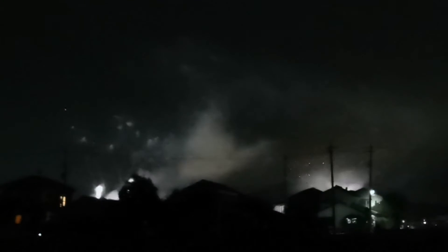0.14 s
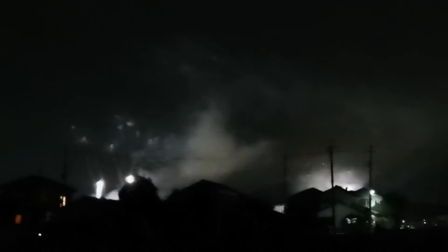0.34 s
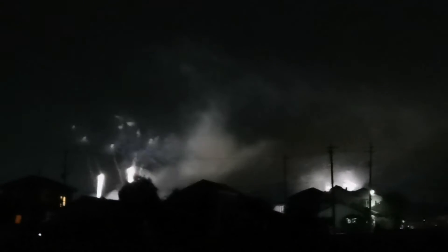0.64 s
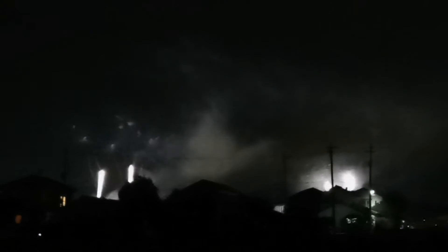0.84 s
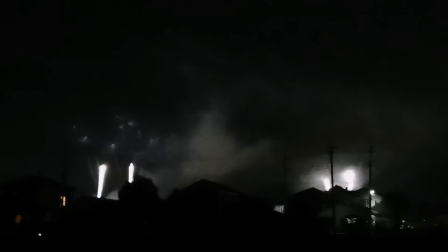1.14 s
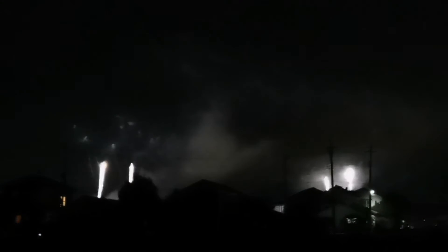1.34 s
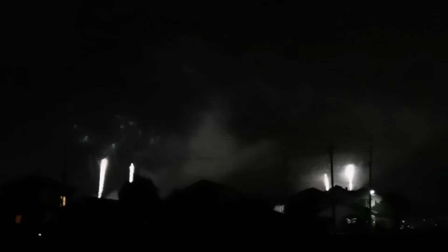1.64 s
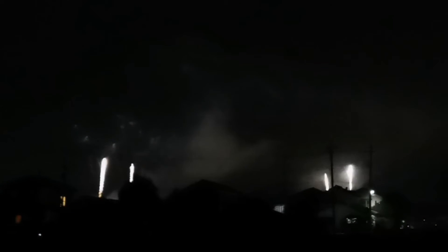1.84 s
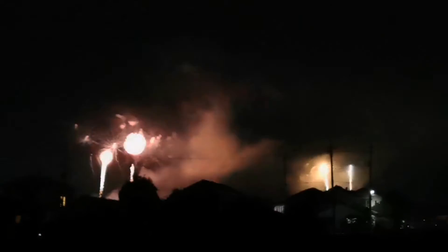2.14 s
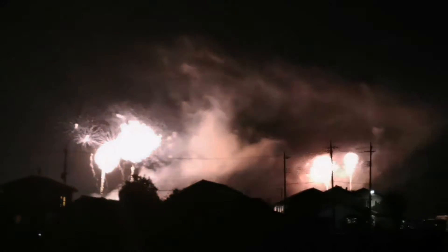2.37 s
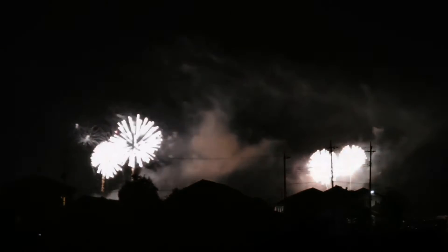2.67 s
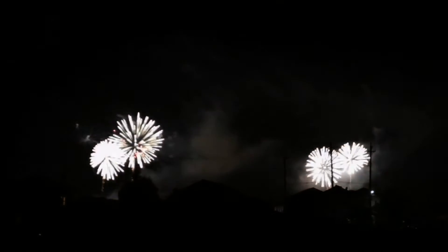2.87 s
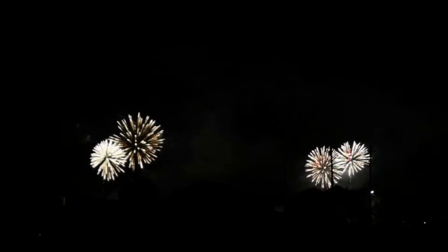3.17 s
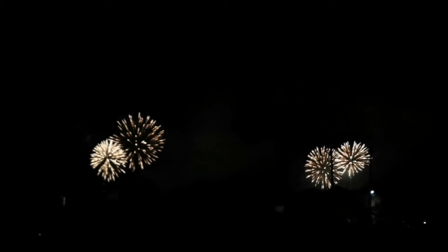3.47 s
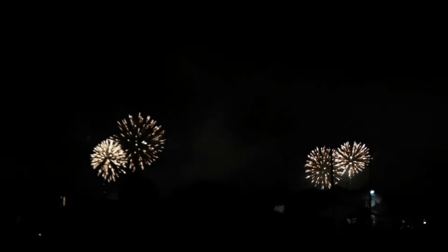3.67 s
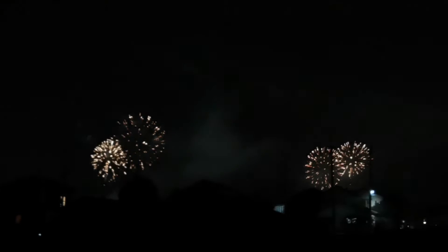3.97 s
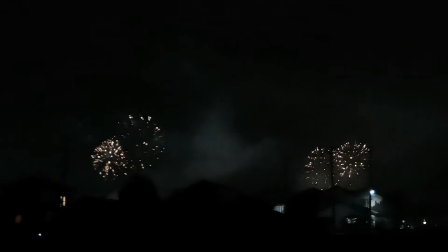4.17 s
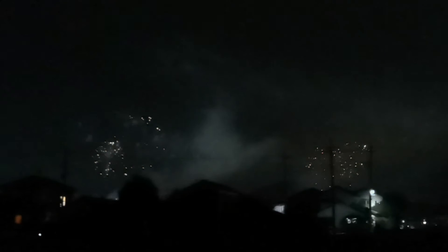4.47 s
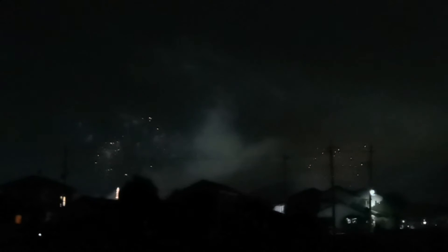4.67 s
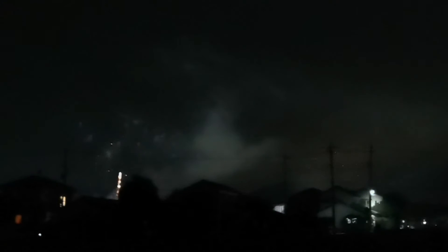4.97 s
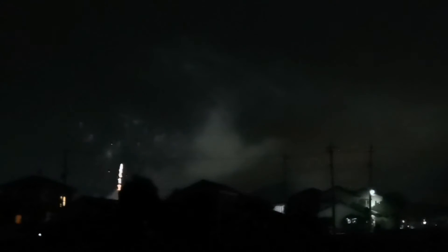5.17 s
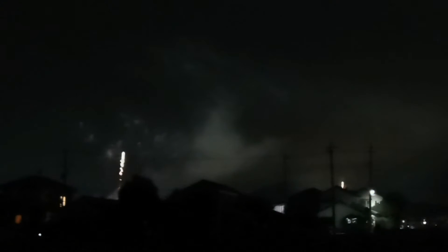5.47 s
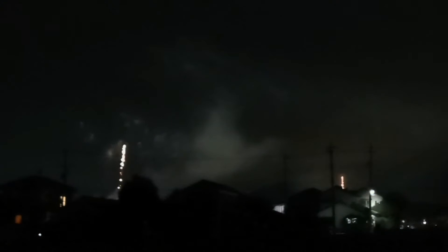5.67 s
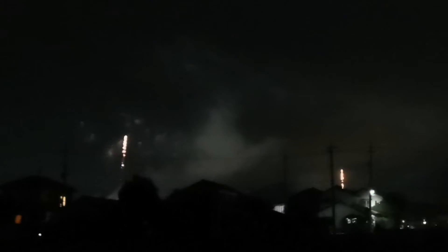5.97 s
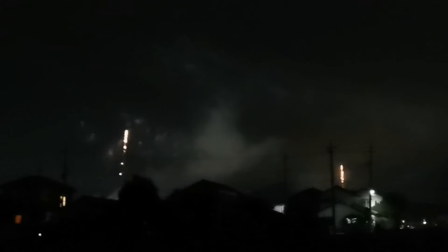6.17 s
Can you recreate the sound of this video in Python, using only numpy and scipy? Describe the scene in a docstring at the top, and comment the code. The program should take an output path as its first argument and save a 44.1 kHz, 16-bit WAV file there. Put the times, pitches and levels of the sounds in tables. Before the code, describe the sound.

Night fireworks about a kilometre off, heard in stereo from among low houses, lasting some six and a half seconds. At 0.1 s a bang cracks, followed at 0.19 s by two practically fused, stronger ones; their short frayed cracks spill into a deep boom and bright, lumpy crackle, with a hillside return about 0.3 s later. Dull far thuds follow at 0.3 to 0.5 s. Softer bangs come at 1.46, 1.58 and 1.81 s, while a brief gritty scuff and several dry clicks, mostly left, sound right at the microphone between 1.5 and 1.7 s. From 2 to 5 s the echoes drain into low, restless rumble with faint muffled thuds. At 5.15 and 5.25 s the heaviest pair slams out, and its rolling boom and crackle decay until the end. Very faint steady hiss underlies everything.

```python
"""Fireworks a kilometre off, heard at night from among low houses.
Each blast is one pressure wave, doubled by nearby walls and scattered into a rolling echo by roofs and open land.
Underneath go far thuds, made as duller waves with a short echo cluster, and a rumble of coloured scattered echoes.
Right at the microphones, bursts of gritty noise make a few scuffs and clicks, over a faint steady hiss."""
import sys
import numpy as np
from scipy import signal
from scipy.fft import rfft, irfft, next_fast_len
from scipy.io import wavfile
from scipy.ndimage import uniform_filter1d, minimum_filter1d, map_coordinates

SR = 44100
rng = np.random.default_rng(int(sys.argv[2]) if len(sys.argv) > 2 else 0)


def digitize_waveform(pressure):
    """Quantize a signal to 16-bit integers and store it at the path in sys.argv[1].

    Rows of a 2-D input are taken as channels; values are limited to [-1, 1].
    """
    field = np.atleast_2d(pressure).T
    bounded = np.clip(field, -1, 1)
    quanta = np.round(bounded * 32767).astype(np.int16)
    wavfile.write(sys.argv[1], SR, quanta)


N = 278271

# Bursts and mortar shots. Each row: start in seconds, direct wave level in dB, push length in seconds,
# dulling corner in Hz, second path delay in seconds, then gains in dB relative to the direct wave:
# second path, frayed crack, roof echo, land boom, land crackle.
BLASTS = [(0.0889, -4.5, 0.0012, 2075, 0.0033, -3.5, 22.5, -15, -12.5, -11.5),
          (0.1852, -3, 0.00091, 893, 0.0029, -5, 24, -12.5, -15.5, -15.5),
          (0.1893, -3, 0.0013, 3090, .0022, -11, 24.5, -15.5, -21.5, -13),
          (1.4599, -7.5, 0.0014, 2180, 0.0014, -5, 23, -17.5, -29, -17),
          (1.5807, -10.5, 0.0023, 634, 0.0064, -11, 26, -16, -19, -30.5),
          (1.8117, -6.5, 0.00089, 1004, 0.00012, -14, 23, -17, -17, -23.5),
          (5.1470, -2.3, 0.00078, 850, 0.0031, -16, 19, -16.5, -13, -19.5),
          (5.247, -1.5, 0.002, 1510, 0.0024, -4, 23, -16, -13.5, -9)]
# Copies off nearby walls. Each row: delay in seconds, level in dB, dulling corner in Hz,
# lag of the right port in seconds.
WALLS = [(.0057, -20.5, 1500, -0.00093), (.0081, -12.5, 900, 0.0028), (0.011, -13, 900, -0.0036),
         (.048, -15.5, 238.5, .0001)]
# Colour of the long path through the air. Each row: frequency in Hz, gain in dB.
AIR_COLOUR = [(60, 2.5), (140, 1), (260, 1), (330, .5), (450, -0.5), (700, -4), (1000, -2.5), (2100, -2.5),
              (3000, -11), (4500, -14), (7500, -34), (15000, -47.5)]
# Colours of the echoes off roofs and land. Each row: frequency in Hz, gain in dB.
ROOF_COLOUR = [(50, -5.0), (110, -1.5), (280, 1), (800, 1.0), (2000, -3.5), (5000, -0.5)]
BOOM_COLOUR = [(45, 3), (75, 3.5), (110, 7.0), (180, -3.0), (400, -6), (900, -3.0), (2500, -53.5)]
CRACKLE_BODY_COLOUR = [(80, -39.5), (400, -1.5), (900, 4.5), (1600, 3.0), (2500, 5.0),
                       (4000, -5.0), (9000, -11.0)]
CRACKLE_EDGE_COLOUR = [(1000, -26), (2500, 1), (5500, 12.5), (9000, 14.0)]
# Far reports and single echoes. Each row: start in seconds, relative level in dB,
# treble in dB (it moves the dulling corner up or down).
FAR_REPORTS = [(0.295, -29.5, -18), (0.321, -37.5, -17), (0.475, -33, -11), (1.02, -43.5, -23),
               (1.271, -47.5, -1), (1.924, -37, -15.5), (2.285, -40.5, -11), (2.929, -42, -36),
               (3.294, -41, -34), (3.433, -43.5, -21), (3.66, -42.5, -33), (3.738, -38, -20.5),
               (3.77, -42.5, -39), (4.012, -41.5, -43), (5.508, -33.5, -16), (5.882, -44.5, 6)]
# Colour of the rumble. Each row: frequency in Hz, relative density in dB per Hz.
RUMBLE_COLOUR = [(15, -34.5), (30, -8), (80, -4.5), (120, -9), (250, -4.5), (330, -8), (540, -10),
                 (950, -20), (1400, -28.5), (2100, -37), (3100, -47), (6000, -60)]
# Distant salvos that arrive only as a swell of the rumble. Each row: start in seconds, level in dB.
SWELLS = [(0.898, -51), (1.9, -51), (2.75, -54), (3.45, -61.5), (4.0, -57.5), (5.85, -50.5)]
# Balance of everything outdoors. Each row: frequency in Hz, dB up on the left and down on the right.
OUTDOOR_TILT = [(60, 0.21), (180, 0.81), (400, -0.83), (1300, -0.79), (2500, -1), (5000, -1.3)]
# Scuffs at the microphones. Each row: start in seconds, rise in seconds, hold in seconds, relative level in dB.
SCUFFS = [(0.388, .025, 0.0023, -62), (1.501, 0.054, 0.036, -43)]
# Clicks at the microphones. Each row: start in seconds, level in dB, t60 in seconds, left over right in dB.
CLICKS = [(1.49, -30, 0.015, -2), (1.5131, -26.5, 0.017, 10.5), (1.5872, -28, 0.011, 7.5),
          (1.65, -22, 0.013, 10), (1.364, -65, 0.064, -3), (2.058, -61, 0.084, -4)]
# Colour that the case gives to clicks and scuffs. Each row: frequency in Hz, relative gain in dB.
CASE_COLOUR = [(300, -45), (1200, -0.5), (2500, 2), (4200, -3), (6500, -5.5), (9000, -1), (11000, -11),
               (14000, -11.5), (16000, -16.5)]
# Colour of the microphone noise. Each row: frequency in Hz, relative gain in dB.
HISS_COLOUR = [(3000, -5.5), (5500, 1), (8000, -7), (11500, 1.5), (14000, -7.5), (15700, -9)]

# The deep echo builds up, holds while the wave crosses the land, then falls; a weak remainder comes from farther off.
BOOM_RISE_S, BOOM_HOLD_S, BOOM_T60_S = 0.022, 0.4, 0.65
AFTERBOOM_DB, AFTERBOOM_T60_S = -4.5, 3.7
CRACKLE_DB, CRACKLE_T60_S = -1.5, 3.18  # the bright echo dies away evenly
HILL_S, HILL_DB, HILL_SPREAD_S = 0.2997, 2, 0.039  # a hillside's return of the crackle, smeared by its slope
# Fainter thuds that come by chance; levels are relative, like those of the far reports.
FAINT_PER_S, FAINT_DB, FAINT_TREBLE_DB, FAINT_SPREAD_DB = 1.5, -53.5, -24, 4.5
RUMBLE_DB, RUMBLE_SINK_DB_PER_S = -52, 0.31  # starting level and slow drain of the old echoes
SWELL_RISE_S, SWELL_T60_S = 0.04, 2.9
SCUFF_GROWS_DB, SCUFF_T60_S = 20, 0.045  # the rub grows as it presses on and stops quickly
RATTLE_DB, RATTLE_T60_S = -28.5, 0.091  # the case rattles on after a click
PORT_LAG_S = 0.00054  # longest lag of a scattered echo between the two microphone ports
TOP_HZ = 15800


def blasts(port_lag=0.0001):
    """The direct wave, a second path bent through the air, the copies off the walls and the long echo."""
    out = np.zeros((2, N))

    def walls(hz):
        return sum(amp(db) * arrival(hz, delay, lag) / (1 + 1j * hz / dull_hz)
                   for delay, db, dull_hz, lag in WALLS)

    for s, db, push, dull_hz, second_s, second_db, fray_db, roof_db, boom_db, crackle_db in BLASTS:
        wave = amp(db) * shock(push, dull_hz)
        crack = signal.fftconvolve(wave, fray(fray_db))[:len(wave)]

        def paths(hz):
            direct = arrival(hz, 0, port_lag)
            second = amp(second_db) * arrival(hz, second_s, port_lag)
            return direct + second + walls(hz)

        add(out, s, filtered(wave + crack, paths))
        tail = echo(roof_db, boom_db, crackle_db)
        add(out, s, signal.fftconvolve(wave[None], tail, axes=1))
    return out


def shock(push, dull_hz, cut_hz=72, damping=1.0, size=4096):
    """A blast wave of peak 1: a jump, then suction; air rounds it and the bass cut makes it swing back."""
    u = np.arange(size) / SR / push

    def rounding(hz):
        bass_cut = -hz * hz / (cut_hz ** 2 - hz * hz + 1j * hz * cut_hz * damping)
        return bass_cut / (1 + 1j * hz / dull_hz)

    wave = causal(filtered((1 - u) * np.exp(-u), rounding), AIR_COLOUR)
    return wave / np.abs(wave).max()


def fray(level_db, t60=0.032, corner_hz=700):
    """Uneven air frays the front of the wave into a brief crack, alike at both ports."""
    t = np.arange(SR // 10) / SR
    onset = 1 - np.exp(-t / 0.00024)
    paths = scatter(len(t))[0] * amp(level_db - 60 * t / t60) * onset
    return filtered(paths, lambda hz: (1j * hz / (corner_hz + 1j * hz)) ** 2)


def echo(roof_db, boom_db, crackle_db, roof_t60=0.26, edge_t60=4.9, lump_db=4.0):
    """Roofs answer at once; the land answers with a deep boom and a lumpy crackle."""
    size = 2 * SR
    t = np.arange(size) / SR
    roof_level = amp(roof_db + 23.5 - 60 * t / roof_t60) * (1 - np.exp(-t / 0.0016))
    roofs = coloured(scatter(size) * roof_level, ROOF_COLOUR)
    boom, crackle = land(t)
    low = coloured(scatter(size) * boom, BOOM_COLOUR)
    returns = scatter(size) * crackle * amp(lump_db * wobble(size, 45))
    body = coloured(returns, CRACKLE_BODY_COLOUR)
    # air absorbs the sharp edge of echoes that come from farther off
    edge = coloured(returns * amp(-60 * t / edge_t60), CRACKLE_EDGE_COLOUR)
    return roofs + amp(boom_db) * low + amp(crackle_db) * (body + edge)


def land(t):
    """Strength of the deep boom and of the bright crackle that return t seconds after a blast."""
    rise = (1 - np.exp(-t / BOOM_RISE_S)) ** 2
    afterboom = amp(AFTERBOOM_DB) * fall(t, AFTERBOOM_T60_S)
    boom = rise * (fall(t - BOOM_HOLD_S, BOOM_T60_S) + afterboom)
    hill = amp(HILL_DB) * np.exp(-((t - HILL_S) / HILL_SPREAD_S) ** 2)
    return boom, amp(CRACKLE_DB) * fall(t, CRACKLE_T60_S) + hill


def far_reports(level_db=2.5, smear_t60=0.082):
    """Small distant thuds, each smeared by a short cluster of echoes."""
    out, size = np.zeros((2, N)), SR // 4
    for s, db, treble_db in FAR_REPORTS + faint_thuds():
        paths = 20 * scatter(size) * amp(-60 * np.arange(size) / SR / smear_t60)
        paths[:, 0] += 1  # the direct path
        wave = shock(0.00047, 4000 * amp(treble_db), cut_hz=207, damping=0.57)
        wave = filtered(wave, lambda hz: 1 / (1 + 1j * hz / 1800))
        thud = signal.fftconvolve(wave[None], paths, axes=1)
        add(out, s, amp(db + level_db) * thud / np.abs(thud).max())
    return out


def faint_thuds(count=16):
    """Rows like those of FAR_REPORTS, at chance times and strengths."""
    gap, strength = rng.random((count, 2)).T
    times = np.cumsum(-np.log(1 - gap)) / FAINT_PER_S
    levels = FAINT_DB + FAINT_SPREAD_DB * (2 * strength - 1)
    return [(s, db, FAINT_TREBLE_DB) for s, db in zip(times, levels) if s < N / SR]


def rumble(flutter_db=0.1):
    """Old echoes from all round merge into a low restless roar; each distant salvo feeds it anew."""
    t = np.arange(N) / SR
    swells = [amp(db) * (1 - np.exp(-np.maximum(t - s, 0) / SWELL_RISE_S)) * fall(t - s, SWELL_T60_S)
              for s, db in SWELLS]
    old_echoes = amp(RUMBLE_DB - RUMBLE_SINK_DB_PER_S * t)
    level = np.sqrt(old_echoes ** 2 + np.sum(np.square(swells), axis=0))  # powers add
    roar = coloured(scatter(N) * amp(flutter_db * wobble(N, 24)), RUMBLE_COLOUR)
    return level * unit(roar)


def handling(left_db=4, scuff_db=-3):
    """Short gritty scuffs, stronger at the left port, and a few dry clicks coloured by the case."""
    t = np.arange(N) / SR
    level = sum(amp(db) * scuff(t - s, rise, hold) for s, rise, hold, db in SCUFFS)
    slips = amp(2.5 * wobble(N, 350))
    out = level * slips * grit(N) * amp([[scuff_db + left_db], [scuff_db - left_db]])
    t = np.arange(SR // 10) / SR
    for s, db, t60, pan_db in CLICKS:
        decay = fall(t, t60) + amp(RATTLE_DB) * fall(t, RATTLE_T60_S)
        ring = decay * (1 - np.exp(-t / 0.0014))
        add(out, s, grit(len(t)) * amp(db) * ring * amp([[pan_db / 2], [-pan_db / 2]]))
    return out


def grit(size):
    """Spiky noise, separate at each port, with the colour of the case and rms 1."""
    return unit(coloured(rng.laplace(size=(2, size)), CASE_COLOUR))


def scuff(t, rise, hold):
    """A rub presses on, holds and lets go; t counts from its start."""
    press = amp(SCUFF_GROWS_DB * np.clip(t / rise - 1, -1, 0))
    return (t > 0) * press * fall(t - rise - hold, SCUFF_T60_S)


def hiss(level_db=-84):
    """Faint steady noise of the two microphones."""
    return amp(level_db) * unit(coloured(rng.standard_normal((2, N)), HISS_COLOUR))


def scatter(size):
    """A dense crowd of small echoes from all directions, with energy 1 a second."""
    count = 2 * size
    when, side = rng.random((2, count))
    height = rng.standard_normal(count)
    lag = (2 * side - 1) * PORT_LAG_S * SR
    ports = [np.bincount((when * size + way * lag / 2).astype(int) % size, height, size)
             for way in (-1, 1)]
    return unit(np.array(ports)) / np.sqrt(SR)


def arrival(hz, delay, lag):
    """Response of the two ports to a delayed wave that reaches the right port later by the lag."""
    return np.exp(-2j * np.pi * hz * np.array([[delay], [delay + lag]]))


def wobble(size, rate):
    """A smooth random curve, rate knots a second."""
    knots = rng.standard_normal(int(size * rate / SR) + 4)
    return map_coordinates(knots, [np.arange(size) * rate / SR])


def fall(t, t60):
    """Gain that is 1 up to t = 0 and then loses 60 dB in t60."""
    return amp(-60 * np.maximum(t, 0) / t60)


def amp(db):
    """Decibels to gain."""
    return 10 ** (np.asarray(db) / 20)


def unit(x):
    """Scale to rms 1."""
    return x / np.sqrt(np.mean(x ** 2) + 1e-20)


def along(points, hz):
    """Gain of (Hz, dB) points on a log axis."""
    f, db = np.transpose(points)
    return amp(np.interp(np.log(hz + 1), np.log(f + 1), db))


def filtered(x, response):
    """x times a complex response of frequency."""
    n = x.shape[-1]
    m = next_fast_len(n + 8192)  # room for the filter to ring out
    return irfft(rfft(x, m) * response(np.fft.rfftfreq(m, 1 / SR)), m)[..., :n]


def coloured(x, points):
    """Shape the spectrum of x by (Hz, dB) points without shifting its phase."""
    return filtered(x, lambda hz: along(points, hz))


def causal(x, points, size=4096):
    """Colour x with minimum phase, so that nothing sounds before the attack."""
    cepstrum = irfft(np.log(along(points, np.fft.rfftfreq(size, 1 / SR))))
    cepstrum[1:size // 2] *= 2
    cepstrum[size // 2 + 1:] = 0
    return signal.fftconvolve(x, irfft(np.exp(rfft(cepstrum))))[:len(x)]


def add(track, s, x):
    """Mix x into the track at time s."""
    start = max(round(s * SR), 0)
    track[:, start:start + x.shape[-1]] += x[..., :max(N - start, 0)]


def scene():
    """The display, its bass leaning slightly left and the rest slightly right, and the noises close by."""
    outdoors = blasts() + far_reports() + rumble()

    def balance(hz):
        left = along(OUTDOOR_TILT, hz)
        return np.array([left, 1 / left])

    return filtered(outdoors, balance) + handling() + hiss()


def record(dry):
    """A look-ahead limiter holds both channels' peaks to 0.92, then all above the band limit is cut."""
    needed = np.minimum(1, 0.92 / (np.abs(dry).max(axis=0) + 1e-9))
    held = minimum_filter1d(needed, size=301)
    gain = uniform_filter1d(uniform_filter1d(held, size=151), size=151)
    return filtered(dry * gain, lambda hz: hz < TOP_HZ)


dry = scene()
out = record(dry)
digitize_waveform(out)
```